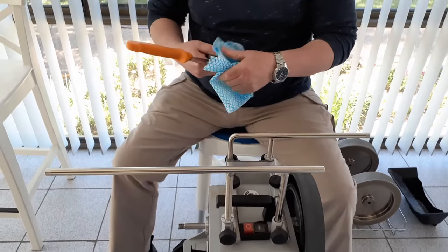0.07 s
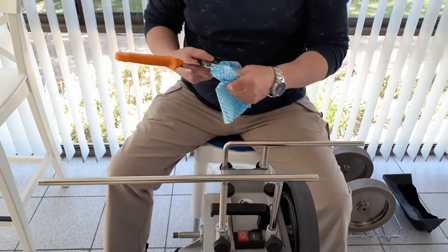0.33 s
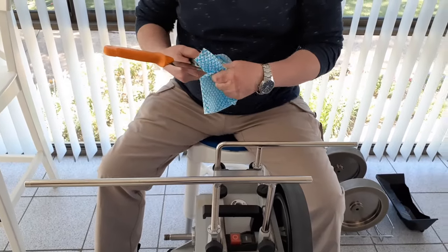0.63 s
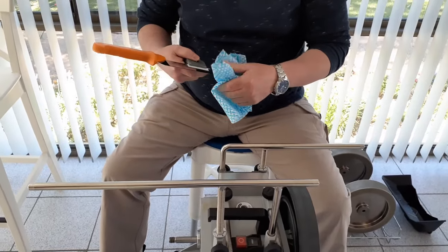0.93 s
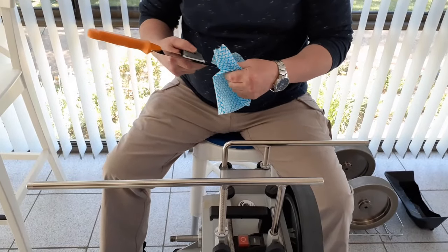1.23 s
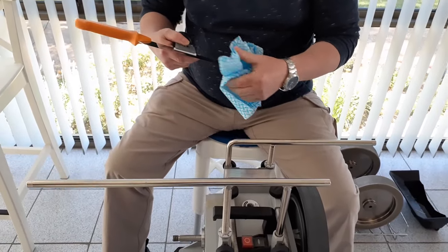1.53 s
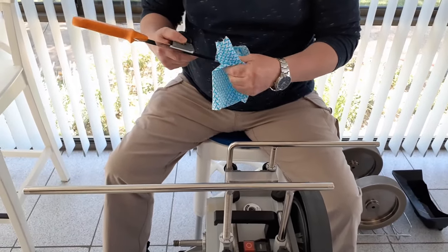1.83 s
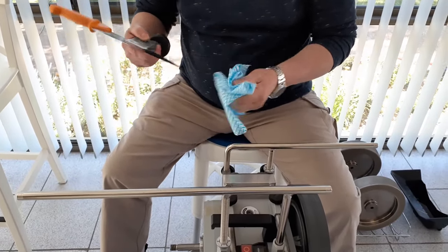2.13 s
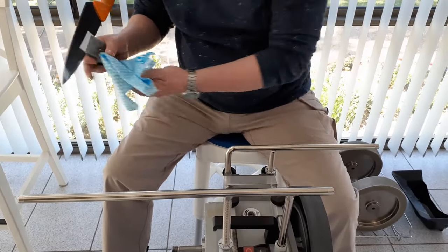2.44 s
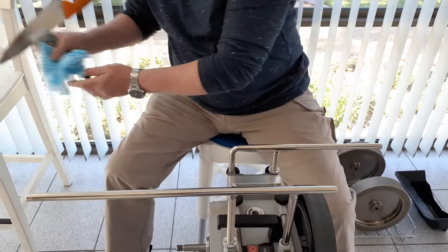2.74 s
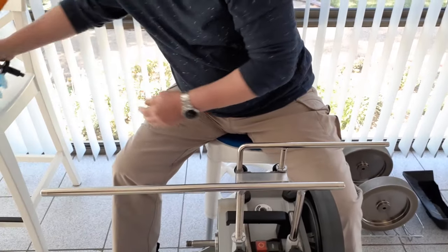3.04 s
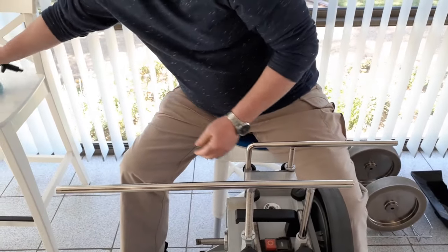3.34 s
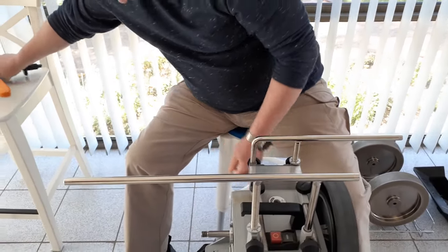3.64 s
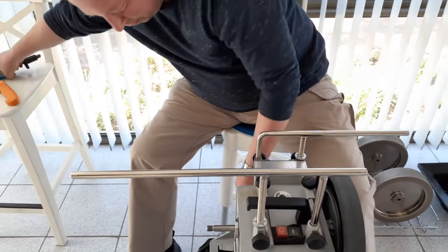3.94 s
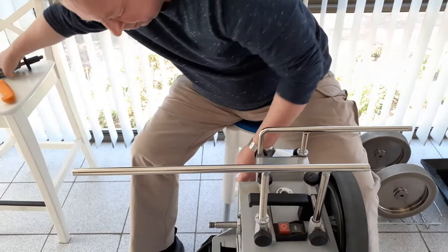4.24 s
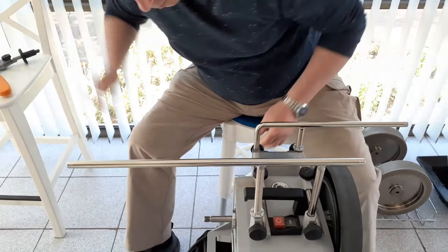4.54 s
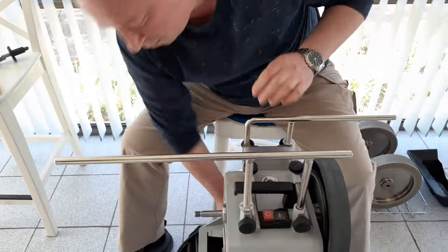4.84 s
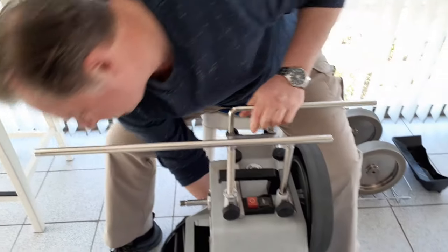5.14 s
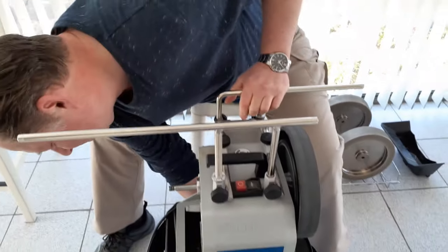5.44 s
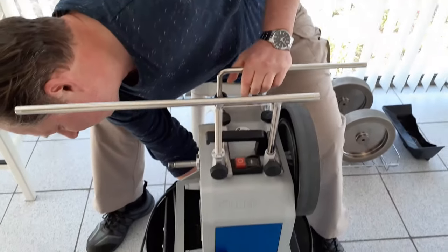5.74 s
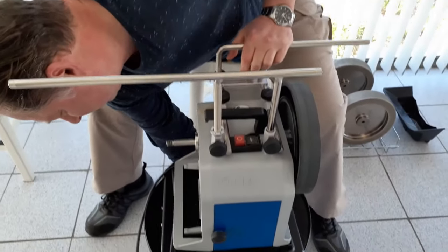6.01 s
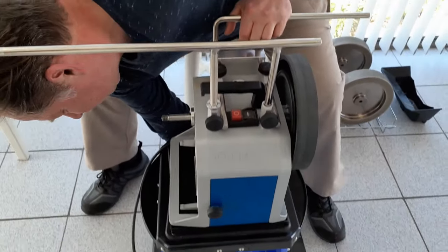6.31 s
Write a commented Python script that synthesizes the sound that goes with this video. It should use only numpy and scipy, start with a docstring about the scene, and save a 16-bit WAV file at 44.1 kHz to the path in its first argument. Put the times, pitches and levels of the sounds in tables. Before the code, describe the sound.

Soft wiping and small clicks, followed by a knife set down with a clatter and loud plastic knocks in a hard, echoing room.

```python
"""Knife, stool and wet grinder

In a tiled workshop a man wipes a knife clamped in a sharpening jig. The cloth hisses and squeaks
on the steel, and the jig clicks in his hand. He lays it on a plastic stool, where it clatters and
settles, then leans on a stopped wet grinder and works its plastic water trough, which knocks and
snaps home. Each struck object rings, and the hard room rings after every blow."""
import sys
import numpy as np
from scipy import signal
from scipy.fft import rfft, irfft, next_fast_len
from scipy.io import wavfile
from scipy.ndimage import uniform_filter1d, minimum_filter1d

SR = 44100
rng = np.random.default_rng(int(sys.argv[2]) if len(sys.argv) > 2 else 0)


def to_wav(s):
    """Save 16-bit WAV."""
    ch = np.atleast_2d(s).T  # columns
    pcm = np.round(np.clip(ch, -1, 1) * 32767)  # PCM
    wavfile.write(sys.argv[1], SR, pcm.astype(np.int16))


N = 280917
TIME = np.arange(N) / SR
BLOW_SAMPLES = 32768  # space for one blow and its echoes
BLOW_TIME = np.arange(BLOW_SAMPLES) / SR
BLOW_HZ = np.fft.rfftfreq(BLOW_SAMPLES, 1 / SR)


def amp(db):
    """Turns decibels into a number to multiply by."""
    return 10 ** (np.asarray(db) / 20)


def unit(x):
    """Scales a signal to an average power of 1."""
    return x / np.sqrt(np.mean(abs(x) ** 2) + 1e-30)


def read(points, hz):
    """Reads between the rows of a table, with every octave equally wide."""
    f, value = np.transpose(points)
    return np.interp(np.log(hz + 1), np.log(f + 1), value)


def add(mix, s, sound):
    """Mixes a sound in at s seconds."""
    part = mix[:, max(round(s * SR), 0):][:, :sound.shape[-1]]
    part += sound[..., :part.shape[1]]


def causal(gain):
    """Makes a spectrum with this gain that rings only after the blow, never before."""
    cepstrum = irfft(np.log(gain + 1e-7))
    cepstrum[1:BLOW_SAMPLES // 2] *= 2
    cepstrum[BLOW_SAMPLES // 2 + 1:] = 0
    return np.exp(rfft(cepstrum))


def shelf(corner_hz, order):
    """Rises from 0 below the corner frequency to 1 above it."""
    return 1 - 1 / (1 + (BLOW_HZ / corner_hz) ** order)


def swell(middle_s, length_s, linger_s):
    """The power of one movement: it speeds up, slows down, and its sound lingers a little."""
    arch = np.cos(np.pi * np.clip((TIME - middle_s) / length_s, -.5, .5)) ** 4
    keep = np.exp(-1 / (linger_s * SR))
    return signal.lfilter([1 - keep], [1, -keep], arch, zi=[keep * arch[0]])[0]


# How wide the room sounds: f/Hz, side level over middle level/dB
STEREO_WIDTH = [(60, -12.5), (180, -21), (420, -10.5), (700, -8.5), (1200, 2), (16000, -5)]

def diffuse(size):
    """The spectrum of noise from all around: long waves reach left and right alike."""
    middle, side = rfft(rng.standard_normal((2, size)))
    width = amp(read(STEREO_WIDTH, np.fft.rfftfreq(size, 1 / SR)))
    return np.array([middle + width * side, middle - width * side]) / np.sqrt(1 + width ** 2)


def noise(tone):
    """Steady stereo noise, shaped by rows of f/Hz, level/dB."""
    size = next_fast_len(N)
    gain = amp(read(tone, np.fft.rfftfreq(size, 1 / SR)))
    return unit(irfft(diffuse(size) * gain, size)[:, :N])


# The tone of the quiet room: f/Hz, relative level/dB
HISS_TONE = [(30, -24.5), (100, -11), (170, -20.5), (300, -22), (1000, -28.5), (3000, -34), (10000, -40),
             (16000, -35)]

def room_hiss(level_db=-77.5):
    """A faint, even hiss fills the workshop."""
    return amp(level_db) * noise(HISS_TONE)


# Slow, heavy movements: middle t/s, length/s, level/dB
WEIGHT_SHIFTS = [(.6, 2.2, -70), (2.7, 1.3, -72), (5.55, .7, -53.5), (6, .75, -61.5)]
# The tone of their rumble: f/Hz, relative level/dB
RUMBLE_TONE = [(20, -29), (38, -15), (62, 6), (80, -8), (110, -11), (170, -15.5), (400, -47.5)]

def rumble(resting_db=-82):
    """A low rumble that never quite stops swells as the man shifts his weight or drags the trough."""
    moving = sum(amp(db) ** 2 * swell(s, length, linger_s=.02) for s, length, db in WEIGHT_SHIFTS)
    return np.sqrt(amp(resting_db) ** 2 + moving) * noise(RUMBLE_TONE)


# Strokes of cloth and sleeves: middle t/s, length/s, light hiss level/dB, firm hiss over light/dB
CLOTH_STROKES = [(-.01, .2, -66, 2), (.17, .22, -65.5, -4), (.325, .16, -54, -3), (.545, .26, -57.5, -2.5),
                 (.77, .44, -61.3, -1.5), (1.08, .14, -68.5, -17), (1.29, .32, -66.3, -10),
                 (1.66, .12, -71.5, -8), (1.91, .34, -65.2, -18), (2.18, .3, -82, 12), (2.47, .4, -79, 2),
                 (2.68, .22, -71, 3.5), (3.19, .36, -72.5, 6), (3.46, .55, -72.5, -6), (3.8, .5, -69, -5),
                 (4.43, .16, -77, 3), (4.78, .2, -67, 7), (5.17, .36, -70, 10), (5.77, .4, -69, 8),
                 (6.28, .4, -73, 12)]

def cloth(grain=0.13, resting_db=-88):
    """Fibres slip over steel and each other: a grainy hiss that deepens under pressure."""
    light_power = firm_power = amp(resting_db) ** 2  # clothes are never quite still
    for s, length, db, pressure_db in CLOTH_STROKES:
        power = amp(db) ** 2 * swell(s, length, linger_s=.038)
        light_power = light_power + power
        firm_power = firm_power + amp(pressure_db) ** 2 * power
    light = noise([(200, -23.5), (2000, -15), (5000, -4), (6500, -1.5), (7800, -2), (10500, 3),
                   (13000, -6), (16000, -3.5)])
    firm = noise([(150, -17), (500, -6), (1400, -6.5), (2200, 5.5), (4000, -1), (7000, -8),
                  (16000, -34.5)])
    catches = np.exp(grain * unit(uniform_filter1d(rng.standard_normal(N), size=200)))
    return unit(catches) * (np.sqrt(light_power) * light + np.sqrt(firm_power) * firm)


def direct(tone, push_db, crack_db, crack_s=.002):
    """Long waves leave a struck object as one push, short ones as a crack from its whole surface."""
    burst = rng.standard_normal((2, BLOW_SAMPLES)) * np.exp(-BLOW_TIME / crack_s)
    scattered = shelf(1200, order=4)
    push = causal(tone * (1 - scattered))
    crack = causal(tone * scattered) * unit(rfft(burst))
    return amp(push_db) * push + amp(crack_db) * crack


# How long the room rings: f/Hz, time to fade by 60 dB/s
ROOM_RING = [(80, 0.8), (250, 0.44), (500, 0.63), (1000, 0.65), (2500, 0.55), (5000, 0.51), (10000, 0.37),
             (16000, 0.23)]

def room(tone, ringing, early_db, build_s=0.011, early_s=0.011, onset_s=0.00033):
    """The tiles throw a blow back: a flurry of near echoes, then a tail whose treble dies first."""
    wash = irfft(diffuse(BLOW_SAMPLES) * ringing)
    hz, t, bands = signal.stft(wash, SR, nperseg=256)
    decay = amp(-60 * t / read(ROOM_RING, hz)[:, None])
    tail = signal.istft(bands * decay, SR, nperseg=256)[1][:, :BLOW_SAMPLES]
    early = amp(early_db) * np.exp(-BLOW_TIME / early_s)
    late = 1 - np.exp(-BLOW_TIME / build_s)
    onset = 1 - np.exp(-BLOW_TIME / onset_s)
    echoes = rfft(tail * np.hypot(late, early) * onset)
    # every band returns the energy that went into it
    sent = uniform_filter1d(tone ** 2, size=30)
    returned = uniform_filter1d((abs(echoes) ** 2).mean(0), size=30)
    return echoes * causal(np.sqrt(abs(sent) / (abs(returned) + 1e-12)))


def strike(blows, body_tone, notes, bass_hz, push_db, crack_db, early_db):
    """Each blow sets the listed notes ringing; a heavy one adds bass, a hard one treble."""
    peaks = sum(amp(db) ** 2 / (1 + (2 * (BLOW_HZ - hz) / width) ** 2) for hz, width, db in notes)
    ringing = np.sqrt(1 + peaks)
    response = amp(read(body_tone, BLOW_HZ)) * ringing
    bass, treble, top = 1 - shelf(bass_hz, order=6), shelf(2100, order=3), shelf(7000, order=4)
    fade = np.minimum(np.linspace(2, 0, BLOW_SAMPLES), 1) ** 2
    out = np.zeros((2, N))
    for s, db, bass_db, treble_db, top_db in blows:
        tone = unit(response * amp(bass_db * bass + treble_db * treble + top_db * top))
        sound = irfft(unit(direct(tone, push_db, crack_db) + room(tone, ringing, early_db)))
        add(out, s, amp(db) * np.sqrt(SR / 20) * fade * sound)  # level as if spread over 50 ms
    return out


# Clicks of the jig: t/s, level/dB, bass/dB, treble/dB, top treble/dB
JIG_CLICKS = [(.056, -38.2, -1.5, -1, 4), (.085, -49, 0, 5, 6), (.256, -46.5, 1.5, -9, 0),
              (.851, -50.7, -3, 10.5, 0), (2.052, -64, 7, 2, -12), (2.302, -58.5, 19, 6, -14),
              (2.345, -59.7, 3, 10.5, -5), (2.574, -60, -9, 0.5, -20), (2.67, -57.7, 2.5, 4.5, 14),
              (2.964, -58.2, 2.5, 1, 9.5), (3.206, -55.7, 13, 7.5, 11), (3.303, -64, -9, -20, 8),
              (3.524, -54.7, 19.5, 4, -9), (3.572, -55.7, 7, 1.5, -3)]
# Its overall tone: f/Hz, relative level/dB
JIG_TONE = [(60, -35.5), (290, -18.5), (380, -10.5), (700, -7), (1200, -3), (1800, -3.5), (2500, -7.5),
            (5000, -20.5), (10000, -28), (16000, -46)]
# The notes heard when it clicks: f/Hz, width/Hz, boost/dB
JIG_NOTES = [(318.4, 5.4, 11), (364, 17, 7.5), (423, 11, 12.5), (451, 14, 9), (640, 5.7, 11), (730, 22, 7),
             (869, 11, 6.5), (1021, 27, 6), (1217, 87, 5), (1700, 32, 4.5)]

def jig():
    """The sharpening jig clicks and rings in the man's hand."""
    return strike(JIG_CLICKS, JIG_TONE, JIG_NOTES, bass_hz=570, push_db=-17, crack_db=-25.5, early_db=-4)


# Thin squeaks of cloth on steel: t/s, length/s, start f/Hz, end f/Hz, level/dB
CLOTH_SQUEAKS = [(.18, .13, 10800, 11200, -75), (0.547, .13, 11900, 12400, -73),
                 (2.56, 0.18, 12900, 11200, -72.5), (3.1, 0.21, 11300, 11600, -77)]

def squeaks(waver=0.021):
    """The cloth sticks and slips on the blade in faint, unsteady glides."""
    out = np.zeros((2, N))
    for s, length, start_hz, end_hz, db in CLOTH_SQUEAKS:
        count = int(length * SR)
        wobble = unit(uniform_filter1d(rng.standard_normal((2, BLOW_SAMPLES)), size=60))[:, :count]
        hz = np.linspace(start_hz, end_hz, count) * (1 + waver * wobble)
        glide = np.sin(2 * np.pi * np.cumsum(hz, 1) / SR)
        add(out, s, amp(db) * unit(glide * signal.windows.tukey(count, .5)))
    return out


# Soft bumps: t/s, level/dB, f/Hz
SOFT_BUMPS = [(1.036, -55, 106), (1.584, -60, 70), (1.69, -58.5, 68), (2.15, -59, 65), (2.47, -64, 74.5),
              (2.822, -62, 61.5)]

def bumps(rise_s=0.0079):
    """Arms and feet give dull pushes that last only a wave or two."""
    out = np.zeros((2, N))
    pulse = BLOW_TIME / rise_s * np.exp(1 - BLOW_TIME / rise_s)
    for s, db, hz in SOFT_BUMPS:
        add(out, s, amp(db) * pulse * np.sin(2 * np.pi * hz * BLOW_TIME))
    return out


def clatter(s, db, bass_db, treble_db, top_db, contacts=6):
    """Lists the knife's bounces: the gaps widen up to a limit, and each hit is weaker and duller."""
    first_gap_s, gap_growth, longest_gap_s = .0047, 2.15, .0178
    loss, deepen, soften = 350, 230, 70  # dB per second
    gaps = np.minimum(first_gap_s * gap_growth ** np.arange(contacts - 1), longest_gap_s)
    return [(s + t, db - loss * t, bass_db + deepen * t, treble_db - soften * t, top_db)
            for t in np.append(0, np.cumsum(gaps))]


# Knocks on the stool, and the landing that bounces: t/s, level/dB, bass/dB, treble/dB, top treble/dB
STOOL_KNOCKS = [(3.712, -37, 18.5, -7, 12), (3.726, -34.7, 18, -3.5, 8), (3.9145, -19, -1, 2.5, 0),
                (4.103, -33.5, 19.5, -3.5, 27), (4.112, -29.5, 17, -11, 17), (4.155, -36, 7, -8, 1)]
KNIFE_LANDING = (3.918, -13.8, -12, 2.5, -5.5)
# The stool's overall tone: f/Hz, relative level/dB
STOOL_TONE = [(40, -45.5), (110, -25), (170, -20), (230, -19), (450, -11.5), (700, -9), (1050, -2),
              (1400, -8.5), (2100, -4.5), (4000, -14), (5500, -22), (7000, -31), (10000, -37.5),
              (16000, -50)]
# The notes heard when it is struck, including the room's low boom: f/Hz, width/Hz, boost/dB
STOOL_AND_ROOM_NOTES = [(63.4, 17, 18), (231.3, 7, 17), (280, 23, 13), (294.3, 21, 2.3), (401.6, 5.2, 17),
                        (471, 13, 15), (538, 11, 12), (618, 6.3, 1.7), (725, 32, 14), (842.4, 24, 13),
                        (928, 10, 14.6), (1168, 36, 13), (1490, 23, 8), (1582, 24, 7), (1855, 21, 13.1),
                        (2100, 14, 10), (2260, 130, 6), (2555, 69, 9), (3075, 22, 13), (3280, 31, 5.4),
                        (3480, 51, 7.3), (3737, 85, 5.2), (3973, 79, 4.9), (4240, 75, 5.7), (6440, 88, 11),
                        (6520, 79, 8), (6920, 100, 7.9), (9770, 200, 8.1)]

def stool():
    """The clamped knife lands on the plastic seat, clatters and settles."""
    return strike(STOOL_KNOCKS + clatter(*KNIFE_LANDING), STOOL_TONE, STOOL_AND_ROOM_NOTES,
                  bass_hz=480, push_db=-9, crack_db=-14, early_db=3.5)


# Knocks on the grinder's case: t/s, level/dB, bass/dB, treble/dB, top treble/dB
CASE_KNOCKS = [(4.615, -65, -19, 14, -1), (4.714, -66, -22, 27, -8), (4.864, -56.5, -15, -9.5, 3),
               (4.968, -48.5, -12, 10, -1.5), (4.981, -37.7, -1, 7.5, -8), (5.143, -52, -4.5, -3, 12.5),
               (5.295, -53, -6, -3, -4), (5.317, -45, 12, -16, 3), (5.381, -49.5, -10, -1, -3)]
# Its overall tone: f/Hz, relative level/dB
CASE_TONE = [(50, -33), (170, -26), (240, -9.5), (400, -4.5), (600, -7), (1000, -2), (2000, -9),
             (4000, -19.5), (7500, -24.5), (10000, -25), (16000, -40)]
# The notes heard when it is struck: f/Hz, width/Hz, boost/dB
CASE_NOTES = [(235.5, 8.9, 15.7), (276, 7.4, 11), (396.4, 7.5, 15), (425, 12, 15.6), (543, 7.1, 9.1),
              (759, 30, 4.2), (876, 12, 4.5), (1004, 20, 3.7), (3900, 39, 9.9)]

def grinder_case():
    """The case of the stopped grinder knocks lightly as the man leans on it."""
    return strike(CASE_KNOCKS, CASE_TONE, CASE_NOTES,
                  bass_hz=535, push_db=-9, crack_db=-25, early_db=-2.5)


# Knocks of the trough, its snap home and the quick hits that follow: t/s, level/dB, bass/dB, treble/dB, top
# treble/dB
TROUGH_KNOCKS_AND_SNAP = [(5.413, -23.8, 12, -4.5, 2), (5.604, -23.8, 10, -8.5, -5.5),
                          (5.625, -37, 9, 4, -2), (5.849, -16.5, -8, -6.5, 1),
                          (5.8515, -16.5, -19, -1.5, 3), (5.853, -13.5, 9.5, 6, -6),
                          (5.884, -18.5, -15, -6, -6), (5.925, -17.5, 18, 3.5, 2),
                          (6.083, -33.5, -2, -8.5, -13)]
# Its overall tone: f/Hz, relative level/dB
TROUGH_TONE = [(35, -82), (70, -28), (120, -30), (220, -11.5), (330, -8), (440, 3.5), (600, 0.5),
               (950, -2.5), (1600, 2), (2500, -7.5), (3500, -8.5), (5500, -14), (7800, -20.5),
               (10500, -20.5), (16000, -36)]
# The notes heard when it is struck, including the room's low boom: f/Hz, width/Hz, boost/dB
TROUGH_AND_ROOM_NOTES = [(67, 10.6, 12.7), (157, 9.5, 7), (197, 12, 8.8), (225, 8.7, 9.3), (272.6, 8.6, 8),
                         (297, 13, 11.1), (337.5, 8, 1.5), (430.4, 19, 14.15), (495, 7.2, 4.7),
                         (574.3, 4.3, 12.8), (646, 4.7, 16.5), (822, 29, 4.1), (782, 36, 6.7),
                         (917, 30, 5.2), (1150, 11, 2.4), (1137, 69, 5.8), (1336, 6, 2.7), (1610, 34, 2.65),
                         (1950, 15, 2.2), (2250, 78, 7.8), (2390, 130, 7.2), (2500, 18, 10),
                         (2700, 75, 5.6), (4340, 32, 2.1)]

def water_trough():
    """The plastic trough knocks as he works it, then snaps home and knocks again just after."""
    return strike(TROUGH_KNOCKS_AND_SNAP, TROUGH_TONE, TROUGH_AND_ROOM_NOTES,
                  bass_hz=570, push_db=-3, crack_db=-6.5, early_db=1)


def scene():
    """The jig in the hand, the stool further off, the grinder close in front, over the soft sounds."""
    knocks = jig() + stool() + grinder_case() + water_trough()
    return knocks + cloth() + squeaks() + bumps() + room_hiss() + rumble()


# How much louder the left side is than the right: f/Hz, left over right/dB
LEFT_BOOST = [(350, 1), (700, 0.2), (1400, 2.5), (2800, 1.5), (5600, 0.9), (10000, 5.5), (14000, 0)]

def record(dry, lowest_hz=46, highest_hz=15850, ceiling=.97):
    """Each side gets its own tone; deep bass is cut, peaks are held down, the very top is cut."""
    size = next_fast_len(N + BLOW_SAMPLES)
    tilt_db = read(LEFT_BOOST, np.fft.rfftfreq(size, 1 / SR)) * np.array([[.5], [-.5]])
    heard = irfft(rfft(dry, size) * amp(tilt_db), size)[:, :N]
    lean = signal.sosfilt(signal.butter(4, lowest_hz, "highpass", fs=SR, output="sos"), heard)
    safe_gain = ceiling / np.maximum(abs(lean).max(0), ceiling)
    held = lean * uniform_filter1d(minimum_filter1d(safe_gain, size=161), size=161)
    top_cut = signal.firwin(511, highest_hz, window=("kaiser", 9), fs=SR)
    return signal.oaconvolve(held, top_cut[None], "same", axes=1)


dry = scene()
out = record(dry)
to_wav(out)
```